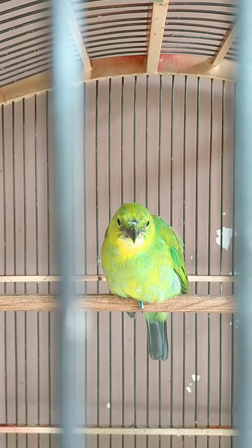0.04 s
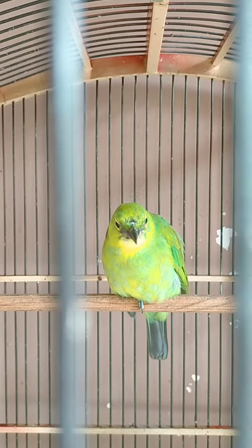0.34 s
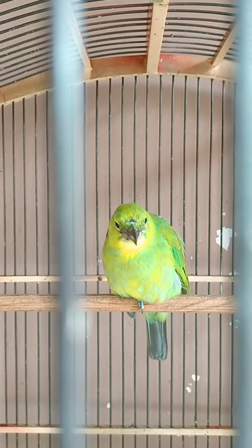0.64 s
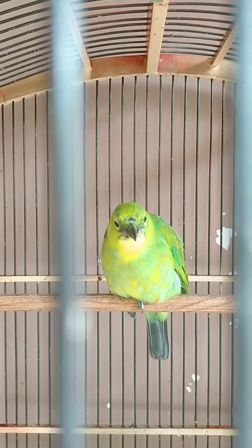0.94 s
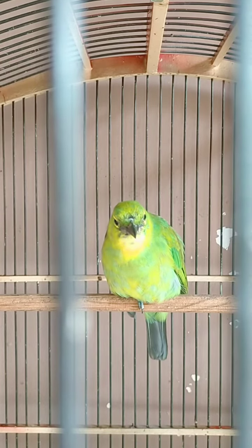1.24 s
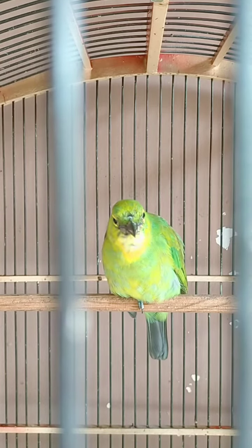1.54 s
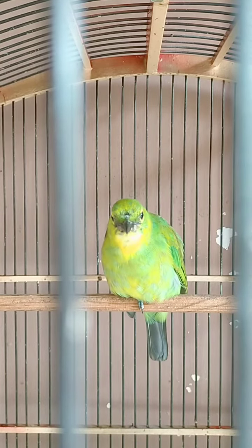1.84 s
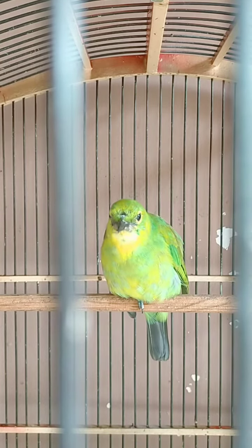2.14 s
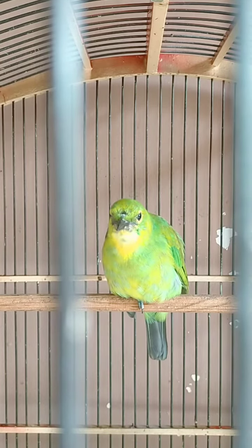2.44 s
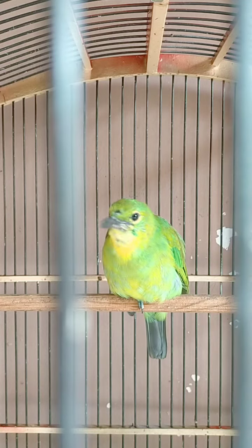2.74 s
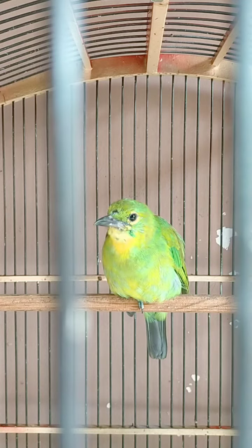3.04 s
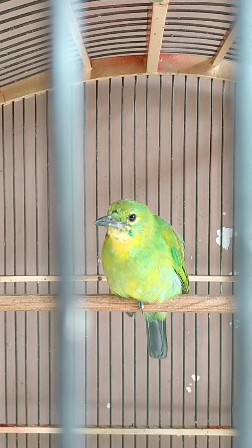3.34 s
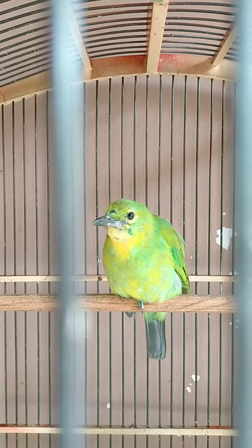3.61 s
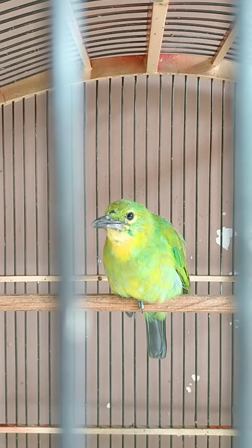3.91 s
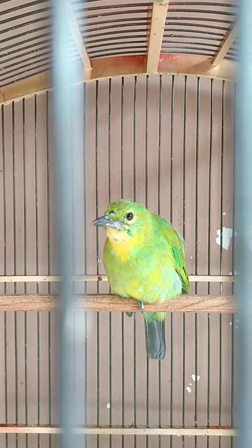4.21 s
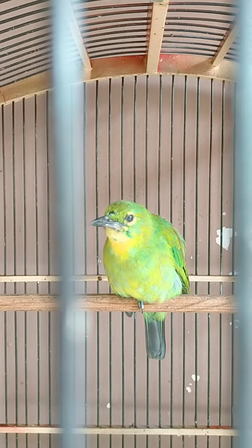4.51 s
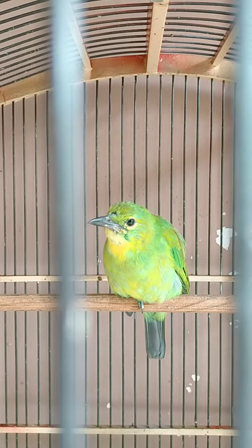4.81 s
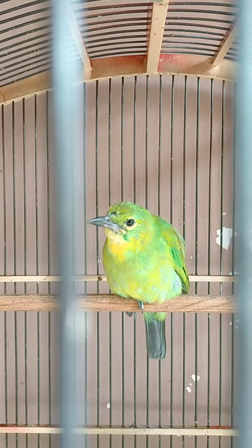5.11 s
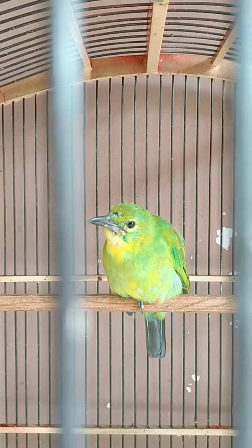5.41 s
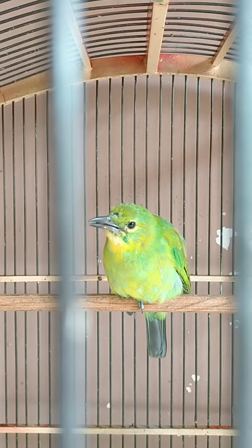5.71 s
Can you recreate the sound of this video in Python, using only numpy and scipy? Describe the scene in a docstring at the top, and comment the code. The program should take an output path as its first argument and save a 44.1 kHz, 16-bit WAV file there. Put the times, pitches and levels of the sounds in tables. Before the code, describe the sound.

A small caged songbird sings fairly near the microphone in a hard-walled room that gives every note a short echo. It opens with buzzy slurs and thin, high chirps. From about 1 to 2.7 seconds, short, lower arched whistles alternate quickly with the high notes, loudest around 1.5 seconds. A soft, dull knock comes at about 2.4 seconds. Mostly thin, high notes follow until two whistles near 3.9 seconds. The song then loosens, with a whistle and three scratchy notes between 4.7 and 5 seconds, and a few more chirps and a bright buzz before it ends near 5.8 seconds. Farther off, a second small bird gives scattered single ticks, then from 3.5 seconds an even run of about twelve a second to the end. Faint room noise, a low outside rumble and a distant motor's hum lie underneath.

```python
"""In a hard-walled room a caged young leafbird rehearses buzzy slurs, thin high notes, scratches and
low arched whistles. Each is a self-sustained oscillation of a membrane in the syrinx, whose two sides
often sound at once. Farther off a second small bird ticks in an even series. Reflections from the walls
prolong both voices. Under them lie faint room noise, a low rumble from outside, a distant motor's hum
and one soft knock."""
import sys
import numpy as np
from scipy import signal
from scipy.fft import rfft, irfft
from scipy.io import wavfile
from scipy.ndimage import uniform_filter1d, map_coordinates

SR = 44100
rng = np.random.default_rng(int(sys.argv[2]) if len(sys.argv) > 2 else 0)


def transcribe(signal):
    """Save signal, clipped to [-1, 1], as a 16-bit WAV file at the path in sys.argv[1]."""
    frames = np.atleast_2d(signal).T
    limited = np.clip(frames, -1, 1)
    pcm = np.round(limited * 32767).astype(np.int16)
    wavfile.write(sys.argv[1], SR, pcm)


N = 258426
TIME = np.arange(N) / SR
SCOOP_S = .018   # each note slides quietly up to pitch for this long before it speaks


def from_db(db):
    """Amplitude ratio: a factor of ten for every 20 dB."""
    return 10 ** (np.asarray(db) / 20)


def rms_one(x):
    """Normalisation to unit mean power."""
    return x / np.sqrt(np.mean(x ** 2) + 1e-20)


def at_hz(points, hz):
    """Interpolation of a table along a logarithmic frequency axis."""
    table = np.array(points)
    return np.interp(np.log(np.maximum(hz, 1)), np.log(table[:, 0]), table[:, 1])


def rfft_hz(size):
    """Bin frequencies of a discrete spectrum, spaced by the reciprocal of the duration."""
    return np.arange(size // 2 + 1) * SR / size


def ease(x):
    """Raised-cosine step from 0 to 1."""
    return np.sin(np.pi / 2 * np.clip(x, 0, 1)) ** 2


def drift(rate, size):
    """Smooth random process of spread about 1, with `rate` independent values a second."""
    knots = rng.standard_normal(2048)
    return map_coordinates(knots, [np.arange(size) * rate / SR], order=3, mode="wrap")


def resonate(x, hz, q):
    """Second-order resonance with unit gain at its peak and bandwidth hz / q."""
    return signal.lfilter(*signal.iirpeak(hz, q, fs=SR), x)


def add(out, start, sound):
    """Superposition of a sound on `out`, from `start` seconds on."""
    at = round(start * SR) + np.arange(len(sound))
    inside = (at >= 0) & (at < N)
    out[at[inside]] += sound[inside]


def arc(pitches_hz, count=17):
    """Glide: a parabola in log frequency through the first, middle and last pitch."""
    parabola = np.polyfit([0, .5, 1], np.log(pitches_hz), 2)
    return np.exp(np.polyval(parabola, np.linspace(0, 1, count)))


def effort(swell_db, sag_db, count=17):
    """Driving pressure sets the level in dB: an arch over the note plus a tilt from start to end."""
    along = np.linspace(0, 1, count)
    return swell_db * (np.sin(np.pi * along) - 2 / np.pi) - sag_db * (along - .5)


def rasp(rough, hz):
    """Chaotic vibration spreads a share of a partial's power into a noise band around it."""
    share = .75 * np.clip(rough, 0, 1) ** 3
    width_hz = .16 * hz.mean()
    chaos = (drift(width_hz, len(hz)) + 1j * drift(width_hz, len(hz))) / np.sqrt(2)
    return np.sqrt(1 - share) + np.sqrt(share) * chaos


def syrinx(length, pitch_hz, level_db, overtone_db, rough, scoop_db, scoop_share=0.21,
           jitter=0.0188, jitter_rate=450, flutter_db=6.0, wobble=0.0056, wobble_rate=140,
           harmonic_fall_db=10, rasp_fall_db=5, overtone_rough=0.2, attack_s=0.0023, release_s=0.0016):
    """Self-oscillating membrane: a gliding harmonic tone that shakes, then rasps, as `rough` nears 1."""
    size = int((SCOOP_S + length) * SR)
    rough = np.clip(rough, 0, 1)
    t = np.arange(size) / SR - SCOOP_S
    along = np.clip(t / length, 0, 1)
    slack = np.clip(-t / SCOOP_S, 0, 1)
    hz = map_coordinates(np.array(pitch_hz, float), [along * (len(pitch_hz) - 1)], order=2, mode="nearest")
    hz *= 1 - scoop_share * slack   # a membrane not yet taut sounds lower
    hz *= 1 + wobble * drift(wobble_rate, size) + jitter * rough * drift(jitter_rate, size)
    phase = 2 * np.pi * np.cumsum(hz) / SR
    db = np.interp(along, (np.arange(len(level_db)) + .5) / len(level_db), level_db)
    db += flutter_db * rough * drift(jitter_rate, size)
    opening = np.maximum(ease(t / attack_s), from_db(scoop_db) * ease(1 - slack))
    gate = opening * ease((t[-1] - t) / release_s)
    fall_db = harmonic_fall_db + rough * (rasp_fall_db - harmonic_fall_db)   # per harmonic
    overtones = sum(from_db(overtone_db - fall_db * (k - 1.5)) * np.exp(1j * k * phase) * (k * hz < SR / 2)
                    for k in range(2, 9))
    # the throat favours the fundamental only once the note is open; uneven closing blurs overtones most
    tone = gate * np.exp(1j * phase) * rasp(rough, hz)
    tone += np.sqrt(gate) * overtones * rasp(rough + overtone_rough, 2 * hz)
    return np.sqrt(2) * from_db(db) * np.imag(tone)


# spectrum of the room noise: f/Hz, relative spectral level/dB
NOISE_SPECTRUM = [(25, -11), (55, -6.5), (130, -3), (240, -11), (700, -11), (1400, -9), (2500, -2),
                  (4000, -18.5), (7000, -37), (9500, -32), (15000, -38)]


def room_noise(level_db=-48.5):
    """Stationary noise: a white spectrum weighted by a fixed envelope."""
    spectrum = rfft(rng.standard_normal(N)) * from_db(at_hz(NOISE_SPECTRUM, rfft_hz(N)))
    return from_db(level_db) * rms_one(irfft(spectrum, N))


# envelope of the rumble: t/s, level/dB
RUMBLE_LEVELS = [(0, -70), (1.2, -56), (1.6, -79), (2.1, -81), (2.25, -57.5), (4.5, -58.5), (4.8, -61),
                 (5.86, -59)]


def rumble(band_hz=(47, 64)):
    """Narrow-band noise from outside, slowly modulated in amplitude."""
    band = signal.butter(2, band_hz, "band", fs=SR, output="sos")
    noise = rms_one(signal.sosfilt(band, rng.standard_normal(N)))
    return from_db(np.interp(TIME, *np.transpose(RUMBLE_LEVELS))) * noise


# envelope of the hum: t/s, level/dB
HUM_LEVELS = [(0, -78), (.8, -59), (1.599, -68), (3.2, -66), (4.8, -68.5), (5.15, -56), (5.86, -57)]


def motor_hum(hz=172, waver=.006):
    """Periodic vibration of a distant motor radiates one slightly wavering tone."""
    phase = 2 * np.pi * np.cumsum(hz * (1 + waver * drift(8, N))) / SR
    return from_db(np.interp(TIME, *np.transpose(HUM_LEVELS))) * np.sqrt(2) * np.sin(phase)


# buzzy slurs: t/s, duration/s, first, middle and last f/Hz, level/dB, relative overtone level/dB, roughness
BUZZ_NOTES = [(0, 0.051, 5130, 5160, 3870, -35, -8.5, 1.23), (0.304, 0.019, 2433, 2760, 3020, -29, -24, 0),
              (0.308, 0.025, 3710, 4930, 5760, -26, -10.5, 0.65),
              (0.544, .014, 2750, 3080, 3920, -27, -16, 0.48),
              (0.558, 0.019, 6200, 6690, 5340, -26.5, -3.5, .7),
              (0.573, 0.056, 5030, 3800, 2650, -30, -15, 0.54),
              (0.741, .04, 5010, 3836, 3140, -33, -22, .75),
              (1.932, 0.039, 5950, 6570, 5120, -36, -14, 1.2),
              (2.132, 0.012, 5540, 6680, 7700, -31, -21, 0.9),
              (2.165, 0.04, 6240, 5210, 4400, -40, 1, 0.44), (2.542, 0.064, 5720, 6960, 4850, -33, -7, 0.8),
              (3.135, 0.0222, 5650, 6620, 7300, -31, -22, 0.6),
              (3.315, 0.025, 7280, 5570, 4570, -43.5, -9, 0.83),
              (5.345, 0.026, 3290, 3600, 3720, -43, 2, 0.76),
              (5.655, 0.016, 2640, 2870, 3800, -27.5, -10.5, 0.16),
              (5.668, 0.038, 4300, 4627, 4224, -21.5, -16.5, .7)]


def buzzes(undertone_db=-24, split_db=3):
    """Period doubling: alternately strong and weak cycles add faint partials of half the pitch."""
    for start, length, *pitches_hz, level_db, overtone_db, rough in BUZZ_NOTES:
        hz = arc(pitches_hz)
        db = level_db + effort(swell_db=-3, sag_db=2.5)
        upper_db = overtone_db - split_db   # the two series share the overtone power
        halves = syrinx(length, hz / 2, db + undertone_db, upper_db - undertone_db, .5 * rough,
                        scoop_db=-17, harmonic_fall_db=7.5, rasp_fall_db=-2.5, overtone_rough=.1)
        yield start, syrinx(length, hz, db, upper_db, rough, scoop_db=-23) + halves, rough


# sweep of one tick: f/Hz at equally spaced moments
TICK_SWEEP = [7700, 6200, 4815, 3800, 2880]
# envelope of one tick: level/dB in each quarter
TICK_LEVELS = [-39.5, -43, -39.5, -42.5]
# single ticks before the run: t/s
LONE_TICK_TIMES = [0.078, 0.165, 0.857, 2.291, 3.453]


def ticks(length=.019, run_start_s=3.519, first_gap_s=.0812, gap_growth_s=.000188, gap_count=27):
    """A brief, steep downward sweep is heard as a tick: a few alone, then a run that slows a little."""
    gaps = first_gap_s + gap_growth_s * np.arange(gap_count)
    out = np.zeros(N)
    for start in [*LONE_TICK_TIMES, run_start_s, *(run_start_s + np.cumsum(gaps))]:
        db = np.array(TICK_LEVELS) + rng.standard_normal()
        tick = syrinx(length, TICK_SWEEP, db, overtone_db=-12.5, rough=0.64, flutter_db=2.0,
                      scoop_db=-28, attack_s=0.0031)
        add(out, start - SCOOP_S, tick)
    return out


# thin high notes: t/s, duration/s, first, middle and last f/Hz, level/dB, fade over the note/dB,
# relative overtone level/dB, roughness
HIGH_NOTES = [(0.225, 0.059, 7170, 6100, 4550, -34, -3, -20.5, 0.44),
              (0.427, 0.035, 6930, 5900, 5000, -30.5, 3, -21, 0.62),
              (0.464, 0.036, 6200, 6000, 5080, -32, 1, -31, 0.54),
              (0.495, 0.038, 6130, 6370, 6400, -30.5, 13, -31, 0.41),
              (0.613, 0.03, 3870, 3560, 3545, -27.5, -14, -26, 0),
              (0.709, 0.073, 8010, 8340, 8260, -30.5, 7.5, -9, 0.54),
              (0.925, 0.066, 6950, 6260, 5655, -29, 3.5, -23, 0.47),
              (1.082, 0.07, 7330, 7200, 6800, -22, 1, -15, .075),
              (1.189, 0.15, 6800, 7300, 7210, -30.5, 1, -12, 0.28),
              (1.486, 0.078, 5680, 5080, 5910, -36, -6.5, -7, 0.48),
              (1.585, .108, 7560, 7300, 7640, -31, -4, -10, 0.52),
              (1.694, 0.088, 7870, 7380, 6680, -36, -4, -16, 0.2),
              (1.856, 0.064, 5800, 5750, 5150, -36, -4, -11.5, 0.12),
              (1.972, 0.082, 5240, 4120, 3880, -44, 9, 5.5, .7),
              (2.002, .067, 7800, 7700, 7680, -38.5, 4, -9, 1.05),
              (2.145, 0.048, 7360, 7950, 7700, -29.5, 13, -11, 0.44),
              (2.251, 0.0737, 7190, 7460, 7410, -29.5, 2.5, -9.5, 0.77),
              (2.359, .087, 6700, 6150, 6860, -32.5, -5, -16.5, 0.33),
              (2.732, 0.078, 7285, 6620, 6460, -28, 2, -18.5, 0.02),
              (2.893, 0.04, 6220, 6170, 6250, -28.5, -2, -13.5, 0.02),
              (2.956, 0.058, 6570, 6580, 6140, -32, 4, -21, 0.4),
              (3.01, 0.081, 7500, 7680, 7530, -50, -1, -1, 0.2),
              (3.156, 0.029, 7450, 7880, 7750, -26.5, 3, -15, 0.18),
              (3.186, 0.035, 6960, 5550, 5850, -36, 9, -8.5, 0.25),
              (3.241, .082, 7590, 7964, 8280, -27.5, 3, -8, 0.42),
              (3.327, 0.07, 8120, 8200, 8070, -38.5, 3, -13, 0.42),
              (3.397, 0.046, 7850, 7450, 7510, -26, 0, -11, 0),
              (3.537, 0.1, 7250, 7270, 7000, -30, 3.5, -12.5, 0.21),
              (3.637, 0.044, 7200, 6900, 6980, -36, -3, -20, 0.16),
              (3.757, 0.069, 7200, 7820, 7700, -28, 12, -19, 0.54),
              (3.811, 0.017, 7650, 7820, 7700, -32, -1, 0.5, 0.77),
              (4.044, 0.073, 5550, 5000, 4930, -35.5, 0, -3, 0.6),
              (4.149, 0.089, 6200, 6500, 6640, -34.5, 1, -22, 0.22),
              (4.343, 0.027, 8100, 8020, 8150, -43, 7, 0, 0.47),
              (4.394, 0.047, 6740, 6400, 5000, -35.5, 7, -19, 0.46),
              (4.435, 0.085, 5000, 4600, 4400, -42, -3, 5.5, 0.3),
              (4.564, 0.046, 6180, 5650, 5070, -39.5, 1, -8, 0.4),
              (5.293, 0.061, 6350, 5850, 4850, -36, 1, -21, 0),
              (5.767, 0.07, 4560, 5150, 5370, -35.5, 6, -33, 0.37)]


def thin_notes():
    """Random frequency modulation makes a high, quickly starting tone waver."""
    for start, length, *pitches_hz, level_db, fade_db, overtone_db, rough in HIGH_NOTES:
        db = level_db + effort(swell_db=0.8, sag_db=fade_db)
        note = syrinx(length, arc(pitches_hz), db, overtone_db, rough, scoop_db=-25, scoop_share=0.18,
                      wobble=0.01175, wobble_rate=130, overtone_rough=0.53, attack_s=0.0013)
        yield start, note, rough


# scratches: t/s, level/dB
SCRATCH_NOTES = [(.703, -33.5), (4.674, -34), (4.792, -32.5), (4.931, -31.5)]


def scratches(length=.05, pitches_hz=(1034, 1770, 2300), beak_hz=6800, beak_q=12):
    """Formant filtering: the partials of a rising rasp pass in turn through the beak's resonance."""
    out = np.zeros(N)
    for start, level_db in SCRATCH_NOTES:
        source = syrinx(length, arc(pitches_hz), effort(swell_db=0, sag_db=17.5), overtone_db=7.5,
                        rough=0.8, scoop_db=-22.5, harmonic_fall_db=-6.0, rasp_fall_db=5.4,
                        overtone_rough=0.051)
        add(out, start - SCOOP_S, from_db(level_db) * rms_one(resonate(source, beak_hz, beak_q)))
    return out


# low arched whistles: t/s, duration/s, first, middle and last f/Hz, source level/dB, roughness
WHISTLE_NOTES = [(.742, 0.041, 2880, 1787, 1526, -30, 0.92), (.948, 0.051, 2059, 2103, 2380, -19.5, 0.15),
                 (.976, 0.038, 2200, 1784, 1325, -24.5, 0.75), (1.058, 0.057, 2040, 2036, 1380, -17.5, 0),
                 (1.196, 0.04, 2080, 2485, 1920, -21.5, .2), (1.317, 0.058, 2020, 2491, 1620, -17.5, 0.17),
                 (1.433, 0.039, 2130, 2233, 2030, -12, 0), (1.547, 0.042, 2050, 2280, 1820, -13, 0),
                 (1.72, 0.046, 2120, 2370, 2065, -16, 0.15), (1.877, 0.041, 2220, 2308, 1900, -17, 0.03),
                 (2.212, .044, 2120, 2434, 1770, -16, 0.03), (2.246, .06, 2950, 3050, 3190, -28, 0.3),
                 (2.37, 0.026, 3050, 2867, 2450, -23.5, 0.77),
                 (2.397, 0.031, 2550, 1915, 1370, -16.5, 0.26), (2.551, 0.035, 2680, 2630, 1690, -18, 0.39),
                 (2.697, 0.0249, 3130, 2960, 2550, -18.5, 0.39), (2.717, 0.025, 2500, 2050, 1790, -23, 0.3),
                 (3.013, 0.063, 2920, 2930, 2916, -34.5, 0.24), (3.28, 0.15, 2150, 2150, 2220, -52, 0.1),
                 (3.883, 0.054, 2945, 2954, 2470, -18.5, 0.36),
                 (3.943, 0.073, 2480, 2112, 2170, -19.5, 0.15),
                 (4.335, 0.18, 2650, 2847, 2955, -40.5, 0.42),
                 (4.705, 0.081, 2290, 2445, 2488, -20.5, 0.23),
                 (4.885, 0.17, 2925, 3022, 2980, -30.5, 0.73), (5.17, 0.13, 3076, 3110, 2900, -40, 0.54),
                 (5.292, 0.0257, 1700, 1620, 1560, -30, 0.76),
                 (5.354, 0.025, 1981, 2000, 2280, -19.5, 0.84), (5.374, .022, 2300, 2395, 2600, -20, 0.59)]


def whistles(throat_hz=2280, throat_q=3.87):
    """Source and filter: the throat passes a tone best near resonance and weakens its overtones."""
    for start, length, *pitches_hz, level_db, rough in WHISTLE_NOTES:
        db = level_db + effort(swell_db=0.5, sag_db=2.1)
        overtone_db = -21 + 20 * rough   # rough notes are brighter
        source = syrinx(length, arc(pitches_hz), db, overtone_db, rough, scoop_db=-15.5, scoop_share=.26,
                        harmonic_fall_db=3.0, rasp_fall_db=0.5, overtone_rough=0.75, wobble=0.0085,
                        wobble_rate=106.2, attack_s=0.005, release_s=.005)
        yield start, resonate(source, throat_hz, throat_q), rough


def leafbird(hiss_db=-15, hiss_above_hz=3000):
    """The notes superpose; air forced through the syrinx adds hiss that follows the rough ones."""
    song, harsh = np.zeros(N), np.zeros(N)
    for start, note, rough in [*whistles(), *thin_notes(), *buzzes()]:
        add(song, start - SCOOP_S, note)
        add(harsh, start - SCOOP_S, rough ** 2 * note)
    song += scratches()
    high_pass = signal.butter(2, hiss_above_hz, "high", fs=SR, output="sos")
    hiss = signal.sosfilt(high_pass, rng.standard_normal(N))
    envelope = uniform_filter1d(np.abs(harsh), size=64)
    return song + from_db(hiss_db) * hiss * envelope


def knock(start_s=2.425, hz=756, q=3.2, level_db=-42, attack_s=0.017, t60_s=0.29):
    """Exponential decay of noise in a broad resonance is heard as a soft, dull knock."""
    t = TIME - start_s
    body = rms_one(resonate(resonate(rng.standard_normal(N), hz, q), hz, q / 2))
    return body * ease(t / attack_s) * from_db(level_db - 60 * np.maximum(t, 0) / t60_s)


# the room's length, width and height: size/m, bird's position/m, microphone's position/m
ROOM_AXES = [(4.37, 1.13, 1.71), (3.19, .83, 1.21), (2.83, 1.57, 1.47)]


def wall_echoes(size, sound_speed=343, low_cut_hz=600):
    """Image sources: each mirror image of the bird sends one echo, later and weaker with distance."""
    squared_offsets = []
    for span, bird, microphone in ROOM_AXES:
        reach = int(size / SR * sound_speed / (2 * span)) + 1
        shifts = 2 * span * np.arange(-reach, reach + 1) - microphone
        squared_offsets.append(np.concatenate([shifts + bird, shifts - bird]) ** 2)
    distance = np.sqrt(sum(np.ix_(*squared_offsets))).ravel()
    lag = np.round((distance - distance.min()) / sound_speed * SR).astype(int)
    echoes = np.bincount(lag, (lag > 0) / distance)[:size]   # without the direct path
    return signal.sosfilt(signal.butter(2, low_cut_hz, "high", fs=SR, output="sos"), echoes)


# reverberation time: f/Hz, T60/s
REVERB_TIMES = [(1500, 0.82), (2300, 0.58), (4500, 0.89), (7500, 0.45), (15000, 0.67)]
# strength of the reverberation relative to the sound that excites it: f/Hz, level/dB
REVERB_LEVELS = [(1500, -5), (2300, -6), (3200, -3), (5000, -4), (7500, 6.5), (10000, -3.5), (15000, -0.5)]


def reverberation(x, tail_s=.6, early_db=3, early_s=0.022):
    """Convolution with the wall echoes, which start strong and decay at each band's own rate."""
    size = int(tail_s * SR)
    t, hz = np.arange(size) / SR, rfft_hz(size)
    echo_spectrum = rfft(wall_echoes(size))
    response = np.zeros(size)
    centres_hz = np.geomspace(1000, 16000, 13)
    for centre in centres_hz:
        share = np.interp(hz, centres_hz, centres_hz == centre)   # overlapping triangular bands
        fade = from_db(-60 * t / at_hz(REVERB_TIMES, centre) + early_db * np.exp(-t / early_s))
        band = irfft(echo_spectrum * share, size) * fade
        gain = np.sqrt(np.mean(share ** 2)) * from_db(at_hz(REVERB_LEVELS, centre))
        response += gain * band / np.linalg.norm(band)
    return signal.fftconvolve(x, response)[:N]


def scene(far_direct_db=-1.5, far_reverb_db=5):
    """The direct-to-reverberant ratio falls with distance, so the far bird has more echo."""
    song, far_bird = leafbird(), ticks()
    direct = song + from_db(far_direct_db) * far_bird
    echoes = reverberation(song + from_db(far_reverb_db) * far_bird)
    return (direct + echoes + knock() + room_noise() + rumble() + motor_hum())[None]


def record(dry, peak_hz=15400, peak_q=2.08, peak_db=4.5, cutoff_hz=15900):
    """Microphone response: a resonance lifts the high treble and a steep low-pass cuts the top."""
    bright = dry + (from_db(peak_db) - 1) * resonate(dry, peak_hz, peak_q)
    return signal.sosfilt(signal.ellip(12, .1, 90, cutoff_hz, fs=SR, output="sos"), bright)


dry = scene()
out = record(dry)
transcribe(out)
```